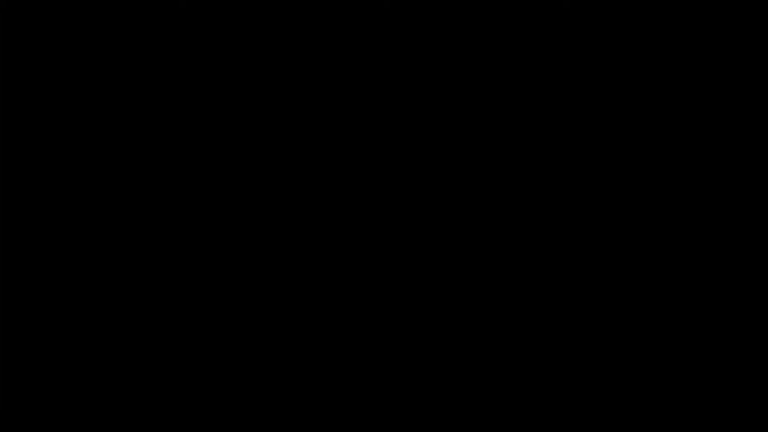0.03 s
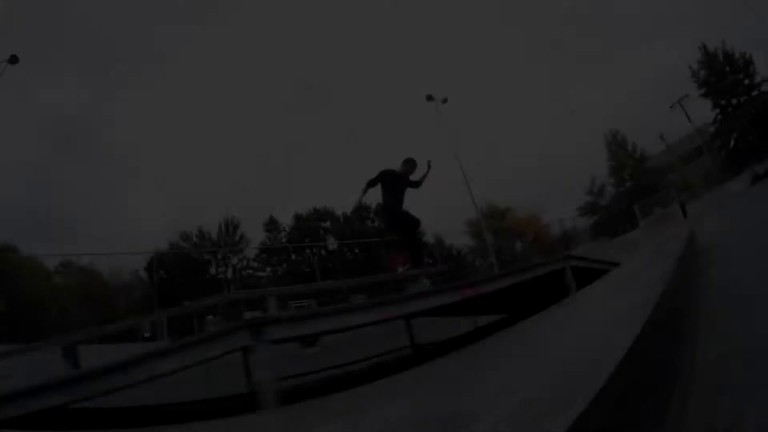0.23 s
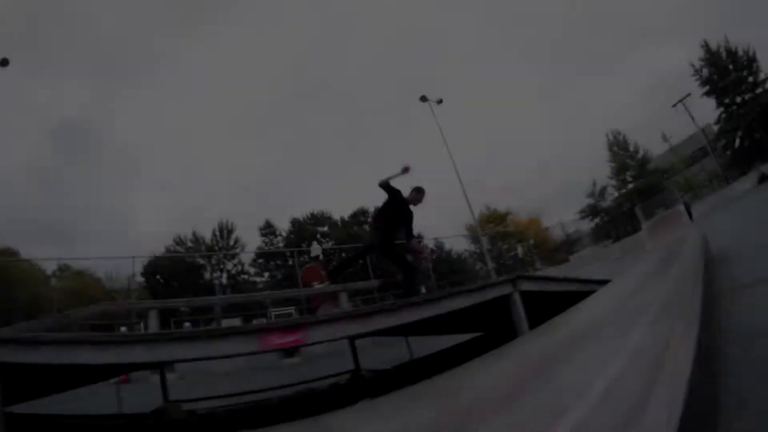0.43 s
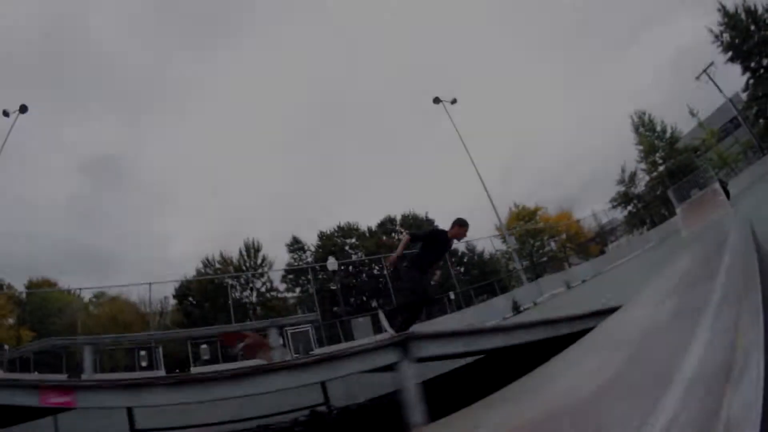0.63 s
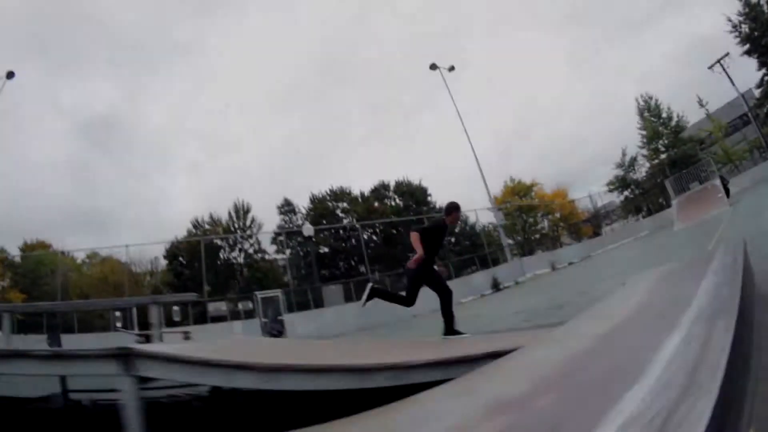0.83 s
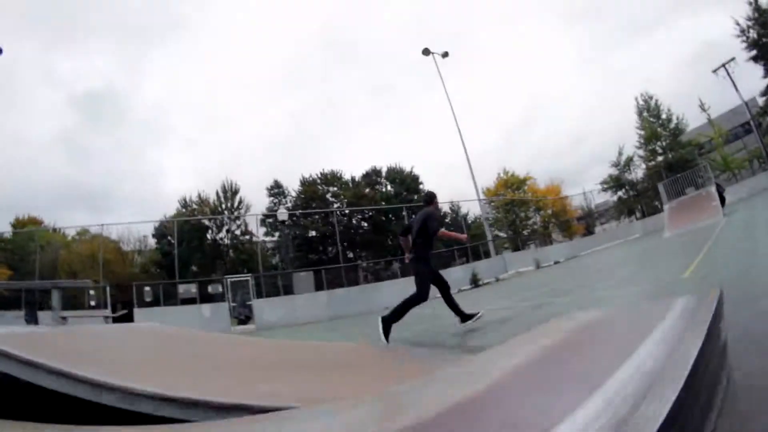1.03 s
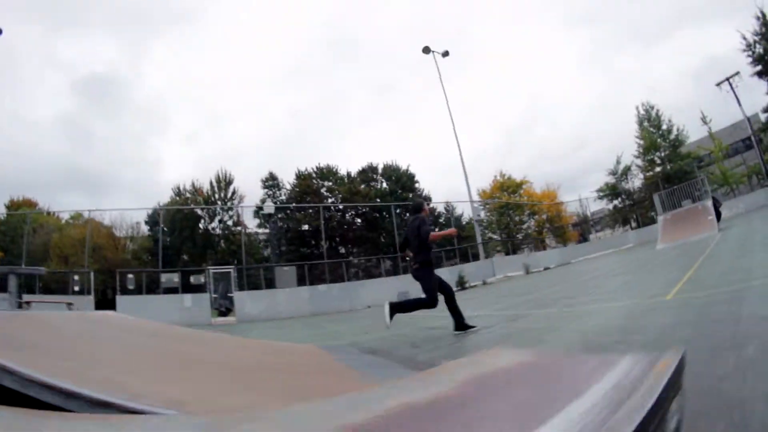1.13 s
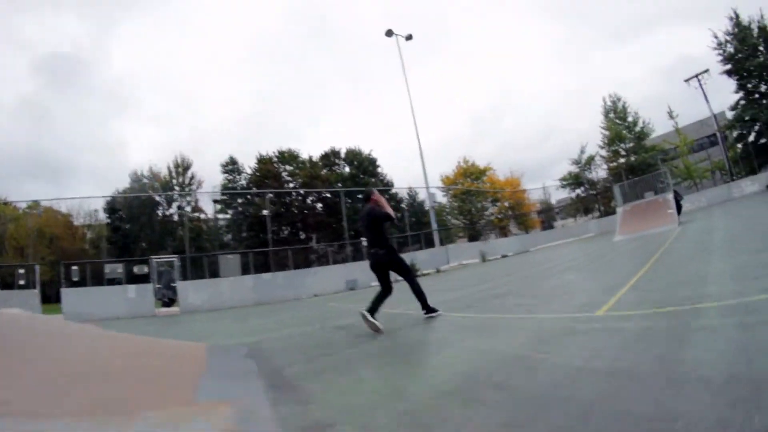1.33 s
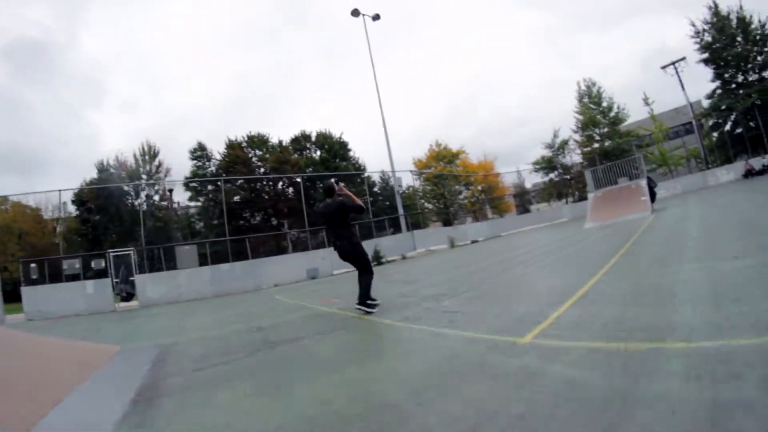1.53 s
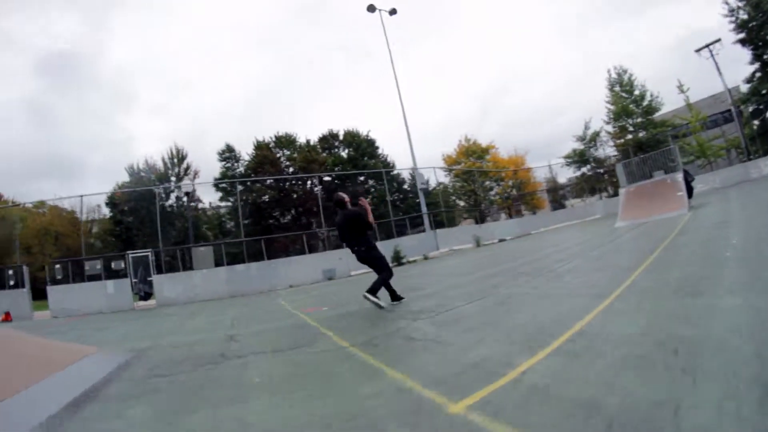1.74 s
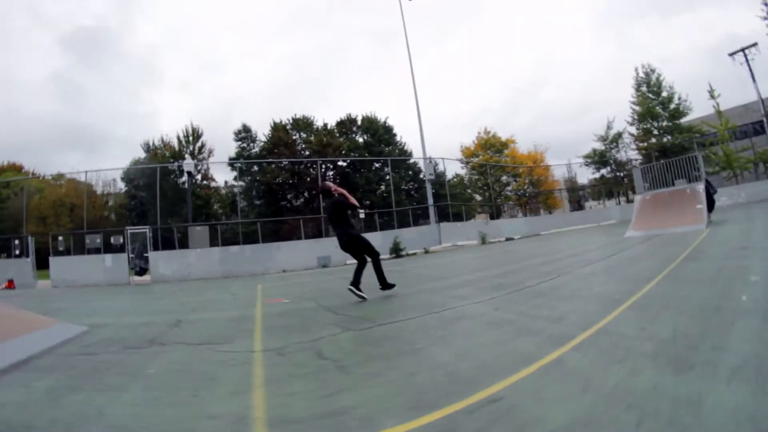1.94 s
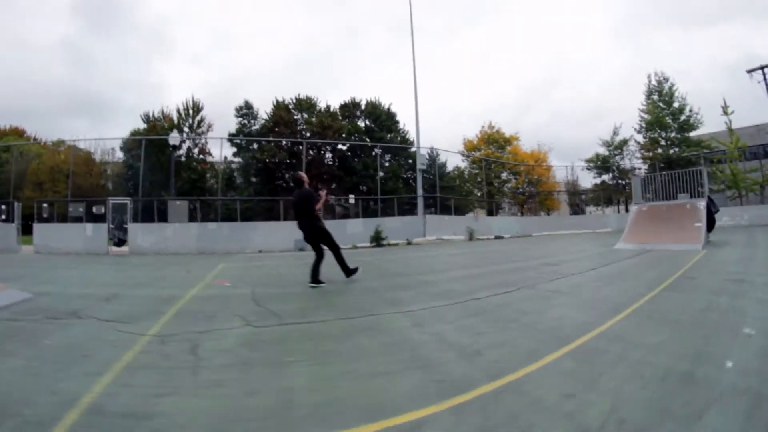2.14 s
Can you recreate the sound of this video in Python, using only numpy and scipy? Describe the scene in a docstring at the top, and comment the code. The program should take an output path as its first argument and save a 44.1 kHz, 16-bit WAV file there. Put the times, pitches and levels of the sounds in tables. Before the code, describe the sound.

Skateboard wheels rumble close by over a ramp and gritty concrete, with sharp clacks.

```python
"""An open skatepark, a skateboard close to the microphone. It fades in rolling over a low, hollow ramp,
grit drumming the deck and hissing under the wheels, with a faint metallic ring beneath. Joints and edges
knock the wheels and a few hard clicks snap on top. At 0.63 s the ramp thuds under the rider's weight.
The board rolls on over rough concrete, soles and wheel edges scuff, and near 1.5 s loose hardware chinks.
Throughout, the park gives back only a thin, short echo."""
import sys
import numpy as np
from scipy import signal
from scipy.fft import rfft, irfft
from scipy.io import wavfile

SR = 44100
rng = np.random.default_rng(int(sys.argv[2]) if len(sys.argv) > 2 else 0)


def int16_out(signal):
    """Quantize to a 16-bit WAV file."""
    q = np.round(np.clip(np.atleast_2d(signal).T, -1, 1) * 32767)
    wavfile.write(sys.argv[1], SR, q.astype(np.int16))


N = 97108

START_S, FADE_S = .15, 0.008
GRAINS_PER_S, GRAIN_SPREAD_DB = 7000, 4
# spectrum of the drumming deck (f/Hz, level/dB)
DECK_COLOUR = [(60, -56), (120, -30.5), (150, -23), (195, -27), (260, -11.5), (370, -5), (415, -9.5),
               (510, 0), (690, -0.5), (790, -10), (1000, -16), (1500, -23), (3000, -104.5), (12000, -120.5)]
# longer rings of the deck (f/Hz, width/Hz, gain/dB)
DECK_RINGS = [(142.8, 28, 2), (379.8, 3.3, -6), (520, 8, -8.5), (546.5, 9.9, -14), (659.5, 4, 0),
              (727.5, 4.7, -9)]


def undb(db):
    """Decibels to gain."""
    return 10 ** (np.asarray(db) / 20)


def unit(x):
    """Scale to rms 1."""
    return x / np.sqrt(np.mean(x ** 2))


def peak(x):
    """Scale to peak 1."""
    return x / np.abs(x).max()


def curve(rows, column=1):
    """Gain over time from a dB column."""
    rows = np.array(rows)
    return undb(np.interp(np.arange(N) / SR, rows[:, 0], rows[:, column]))


def colour(x, points, size=4096):
    """Minimum-phase filter through (f/Hz, level/dB) points."""
    hz, db = np.array(points).T
    f = np.maximum(np.fft.rfftfreq(size, 1 / SR), 1)
    gain = undb(np.interp(np.log(f), np.log(hz), db))
    cepstrum = irfft(np.log(gain))
    cepstrum[1:size // 2] *= 2
    cepstrum[size // 2 + 1:] = 0
    response = irfft(np.exp(rfft(cepstrum)))
    return signal.fftconvolve(x, response)[:len(x)]


def add(out, start, sound):
    """Mix a sound in at a time in seconds."""
    i = int(start * SR)
    out[i:i + len(sound)] += sound[:N - i]


def impacts(rate, spread_db):
    """Random tiny impacts at a rate per second, a few much bigger than the rest."""
    size = undb(spread_db * np.minimum(rng.exponential(size=N), 4))
    return (rng.random(N) < rate / SR) * size * rng.choice([-1, 1], N)


def resonate(x, modes):
    """Add narrow rings to a sound."""
    return x + sum(undb(db) * signal.lfilter(*signal.iirpeak(hz, hz / width, fs=SR), x)
                   for hz, width, db in modes)


def struck(t, modes):
    """Decaying modes after one blow."""
    return sum(undb(db) * np.exp(-np.log(1000) * t / t60) * np.sin(2 * np.pi * hz * t)
               for hz, db, t60 in modes)


def contact(t, tail_s, tail_db):
    """One hard push followed by a fading chatter."""
    return (t == 0) + undb(tail_db) * rng.standard_normal(len(t)) * np.exp(-t / tail_s)


def rolling(turn_hz=19.1, throb_db=1.27):
    """Bumps drive deck and wheels and grit hisses, throbbing with each wheel turn over a low rumble."""
    # drumming of the deck and rattle of the wheels (t/s, deck level/dB, relative wheel level/dB)
    roll_levels = [(.15, -73, -78), (.21, -55.5, -58.5), (.27, -45.5, -51), (.39, -37.5, -43),
                   (.5, -29, -36.5), (.59, -20, -26), (.65, -21, -31), (.69, -20.5, -24),
                   (.735, -20, -30.5), (.78, -17, -23.5), (.86, -21.5, -32), (.92, -29.5, -35.5),
                   (.97, -26, -38), (1.06, -31.5, -39), (1.14, -23.5, -32), (1.3, -22, -32),
                   (1.45, -15, -26.5), (1.56, -13, -26), (1.68, -16, -27), (1.84, -18.5, -30),
                   (1.92, -15, -27.5), (2.06, -15.5, -28), (2.2, -18.5, -29.5)]
    # hiss of grit, fine sizzle and low rumble over time (t/s, relative level/dB)
    hiss_levels = [(.15, -53), (.3, -56), (.37, -43.5), (.47, -45.5), (.62, -33.5), (.72, -34), (.86, -41),
                   (.96, -45.5), (1.04, -50), (1.17, -42.5), (1.19, -32.5), (1.28, -34), (1.42, -33),
                   (1.62, -44), (1.78, -38.5), (1.92, -31.5), (2.02, -36.5), (2.1, -43), (2.2, -33.5)]
    sizzle_levels = [(.15, -104), (.3, -68), (.48, -68), (.6, -55), (.85, -63), (.9, -59), (1.05, -75.5),
                     (1.25, -60.5), (1.44, -63), (1.5, -60), (1.56, -68), (1.9, -71), (2.13, -68.5),
                     (2.16, -50.5), (2.2, -73)]
    rumble_levels = [(.15, -90), (.22, -70), (.32, -54), (.55, -42.5), (.63, -32.5), (.7, -39), (.88, -42),
                     (1.05, -48.5), (1.25, -45.5), (1.34, -32.5), (1.41, -38.5), (1.5, -37), (1.58, -45.5),
                     (1.75, -50.5), (1.97, -44), (2.2, -47)]
    # spectra of wheels, hiss, sizzle and rumble (f/Hz, level/dB)
    wheel_colour = [(400, -28.5), (750, -9), (1050, 5), (1300, 3), (1550, -3.5), (1900, -13.5), (2400, -25),
                    (4000, -75.5), (12000, -86)]
    hiss_colour = [(900, 5), (2000, 6.5), (2700, 7), (3800, 2), (5000, -4), (6200, -8.5), (8500, -19),
                   (12000, -28.5), (16000, -40)]
    sizzle_colour = [(3000, 0), (7000, -0.5), (10000, -2.5), (16000, -7)]
    rumble_colour = [(15, -20), (30, -10), (50, -4.5), (85, 5.5), (130, 1.5), (220, 9), (300, 2),
                     (500, -27.5), (2000, -60.5)]
    # longer rings of the wheels (f/Hz, width/Hz, gain/dB)
    wheel_rings = [(1076, 60, -14.5), (1262, 90, -12.5), (1880, 39, -5), (2224, 21, 1.5)]
    t = np.arange(N) / SR
    throb = undb(throb_db * np.sin(2 * np.pi * turn_hz * t))
    bumps = throb * impacts(rate=1800, spread_db=2)
    grains = throb * impacts(GRAINS_PER_S, GRAIN_SPREAD_DB)
    ticks = throb * impacts(rate=1500, spread_db=3)
    deck = unit(resonate(colour(bumps, DECK_COLOUR), DECK_RINGS)) * curve(roll_levels)
    wheels = unit(resonate(colour(bumps, wheel_colour), wheel_rings)) * curve(roll_levels, column=2)
    hiss = unit(colour(grains, hiss_colour)) * curve(hiss_levels)
    sizzle = unit(colour(ticks, sizzle_colour)) * curve(sizzle_levels)
    rumble = unit(colour(rng.standard_normal(N), rumble_colour)) * curve(rumble_levels)
    return deck + undb(3) * wheels + undb(-6.5) * hiss + undb(0.5) * sizzle + rumble


def metal_ring():
    """Metal rings faintly under the board's approach."""
    # slowly dying modes of the metal (f/Hz, level/dB, t60/s)
    modes = [(1304, -61, 2.0), (1316, -60.5, 2.0), (3970, -68, 1.0), (4600, -71, .6)]
    out = np.zeros(N)
    add(out, START_S, struck(np.arange(N) / SR, modes))
    return out


def knocks(decay_cycles=0.54, crack_delay_s=0.000992):
    """A wheel meets a joint or edge: a few damped cycles, a drum of the deck and a crack."""
    # blows on the wheels (t/s, ring level/dB, ring f/Hz, crack level/dB)
    blows = [(.226, -42.5, 520, -56), (0.344, -20.5, 924, -40), (.433, -24.5, 626, -42),
             (0.6209, -14.5, 570, -17.5), (.628, -10.5, 550, -30), (.7535, -17.5, 574, -19.5),
             (.7735, -26, 754, -19.5), (.778, -33, 955, -34), (.8275, -3.5, 856, -9.5),
             (0.8314, -3.5, 572, -12), (0.84, -3, 950, -13), (0.9305, 0, 1120, -14),
             (0.9422, -3.5, 1030, -20.5), (.9755, -22.5, 1460, -30), (.99, -22.5, 1100, -51),
             (.9985, -13.5, 990, -30), (1.022, -15.5, 580, -58), (1.154, -13.5, 935, -38),
             (1.165, -19, 580, -49), (1.1945, -10.5, 520, -42), (1.25, -12, 980, -37),
             (1.304, -14.5, 600, -53), (1.514, -2.5, 648, -30), (1.6265, -10.5, 606, -25),
             (1.669, -6, 920, -25), (1.7744, -3.5, 864, -39), (1.854, -26, 680, -35),
             (1.8905, -8.5, 590, -36), (1.932, -6, 620, -40), (2.028, -25, 588, -42),
             (2.042, -0.5, 886, -28), (2.1305, -5.5, 595, -50)]
    # spectrum of a crack (f/Hz, level/dB)
    crack_colour = [(300, -6), (1000, 12.5), (2300, 5), (2800, -9.5), (4800, -13), (6000, -23),
                    (8000, -20.5), (11000, -28), (16000, -40.5)]
    out, t = np.zeros(N), np.arange(4096) / SR
    impulse = 1. * (t == 0)
    deck = undb(-8.5) * peak(resonate(colour(impulse, DECK_COLOUR), DECK_RINGS))
    for start, db, hz, crack_db in blows:
        age = t * hz / decay_cycles
        ring = peak(age ** 2 * np.exp(-age) * np.sin(2 * np.pi * hz * t))
        crack = peak(colour(contact(t, tail_s=0.0055, tail_db=-14.5), crack_colour))
        add(out, start, undb(db) * (ring + deck))
        add(out, start + crack_delay_s, undb(crack_db) * crack)
    return out


def clicks():
    """Hard parts of the board snap and ring briefly."""
    # sharp clicks (t/s, relative level/dB, chatter against the push/dB, low-pass f/Hz)
    hits = [(0.323, -37, -34, 14000), (0.346, -20.5, -15.5, 14000), (0.3683, -34, -27, 7000),
            (0.505, -29, 2, 8950), (0.8856, -25.5, -8, 15000), (1.677, -25, -15.5, 9100),
            (1.8146, -10, -23, 7800), (1.8562, -13.5, -25, 4100), (1.873, -14, -17.5, 9200),
            (1.919, -20, -23, 6500)]
    # spectrum of a snap (f/Hz, level/dB)
    snap_colour = [(500, -14), (1500, 2.5), (2700, 6.5), (4000, 3.5), (5000, -5.5), (7200, -8), (9500, -18),
                   (16000, -29)]
    # modes of the hard parts (f/Hz, level/dB, t60/s)
    modes = [(1864, -5.5, 0.027), (2433, -22.5, 0.045), (2870, -16, 0.023), (3824, -18.5, 0.015),
             (5660, -22, 0.011), (7020, -29, 0.01)]
    out, t = np.zeros(N), np.arange(4096) / SR
    for start, db, tail_db, edge_hz in hits:
        snap = peak(colour(contact(t, tail_s=0.0042, tail_db=tail_db), snap_colour))
        lowpass = signal.butter(2, edge_hz, fs=SR)
        add(out, start, undb(db) * signal.lfilter(*lowpass, snap + struck(t, modes)))
    return out


def ramp_thud(start_s=0.63, hz=76, rise_s=0.0061, peak_db=-26):
    """The hollow ramp gives one low thud under the rider's weight."""
    out, t = np.zeros(N), np.arange(N) / SR
    thud = peak(t * np.exp(-t / rise_s) * np.sin(2 * np.pi * hz * t))
    add(out, start_s, undb(peak_db) * thud)
    return out


def scuffs(rise_s=0.0027):
    """Soles and wheel edges scuff the surface: short gritty slides that bite and die away."""
    # slides (t/s, decay/s, level/dB)
    slides = [(.881, 0.017, -43.5), (1.182, 0.055, -40), (1.499, .012, -38.5)]
    # spectrum of a scuff (f/Hz, level/dB)
    scuff_colour = [(800, -27), (2200, -5), (3600, 5.5), (5000, -7.5), (8000, -18), (12000, -22),
                    (16000, -23.5)]
    out, t = np.zeros(N), np.arange(8192) / SR
    for start, decay_s, db in slides:
        grains = impacts(GRAINS_PER_S, GRAIN_SPREAD_DB)[:len(t)]
        envelope = peak((1 - np.exp(-t / rise_s)) * np.exp(-t / decay_s))
        add(out, start, undb(db) * unit(colour(grains, scuff_colour)) * envelope)
    return out


def chinks():
    """Loose metal hardware is struck and rings high and short."""
    # blows on the hardware (t/s, relative level/dB)
    hits = [(1.503, -28.5), (1.508, -29.5), (1.55, -41.5)]
    # modes of the hardware (f/Hz, level/dB, t60/s)
    modes = [(4290, -2.5, 0.033), (6040, -8, 0.022), (6500, -22, .03), (7720, -12.5, 0.014)]
    out, t = np.zeros(N), np.arange(4096) / SR
    for start, db in hits:
        add(out, start, undb(db) * struck(t, modes))
    return out


def park(direct, delay_s=.012, decay_s=0.019, echo_db=-30):
    """Faint scatter from ramps and low walls reaches the microphone just after the direct sound."""
    t = np.arange(16384) / SR
    scatter = rng.standard_normal(len(t)) * np.exp(-t / decay_s) * (t > delay_s)
    echo = unit(scatter) / np.sqrt(len(t))
    return direct + undb(echo_db) * signal.fftconvolve(direct, echo)[:N]


def scene():
    """The board close to one microphone in the open park, silent until the fade-in."""
    fade_in = np.clip((np.arange(N) / SR - START_S) / FADE_S, 0, 1)
    bed = fade_in * (rolling() + metal_ring())
    return park(bed + knocks() + clicks() + ramp_thud() + scuffs() + chinks())[None]


def record(dry, ceiling=.95, top_hz=15800):
    """The recorder rounds the highest peaks and cuts the top of the treble."""
    rounded = dry / (1 + (dry / ceiling) ** 8) ** (1 / 8)
    lowpass = signal.ellip(12, .2, 80, top_hz, fs=SR, output="sos")
    return signal.sosfilt(lowpass, rounded)


dry = scene()
out = record(dry)
int16_out(out)
```